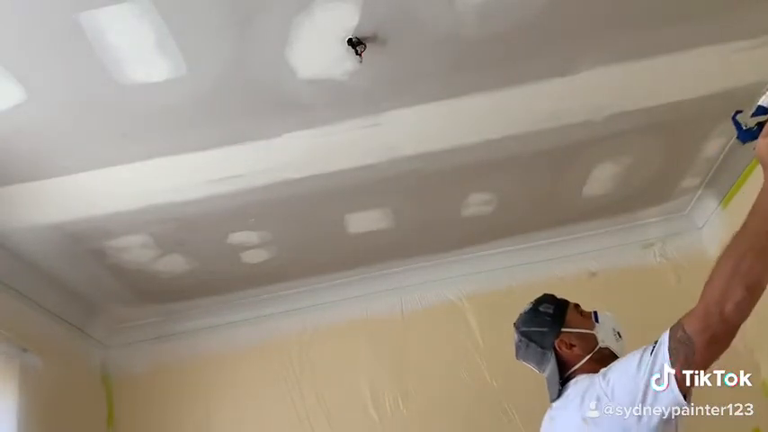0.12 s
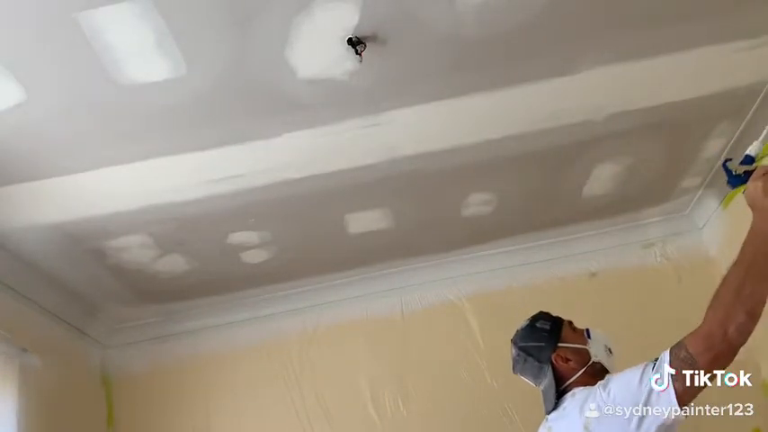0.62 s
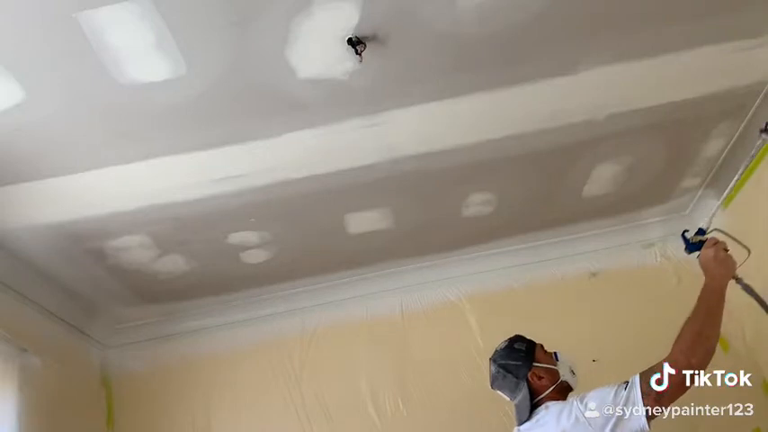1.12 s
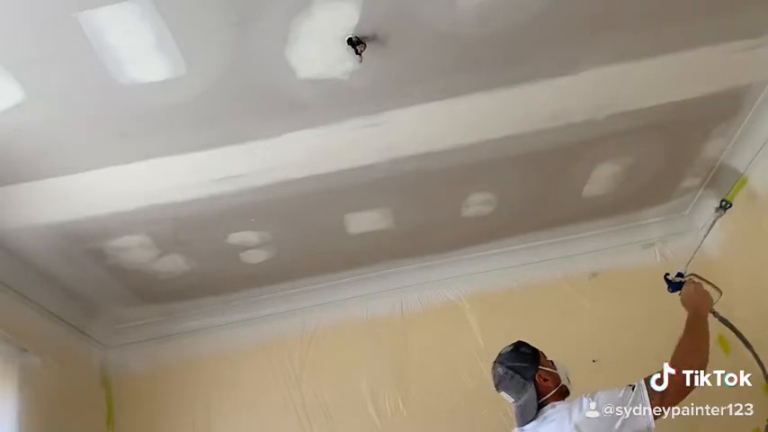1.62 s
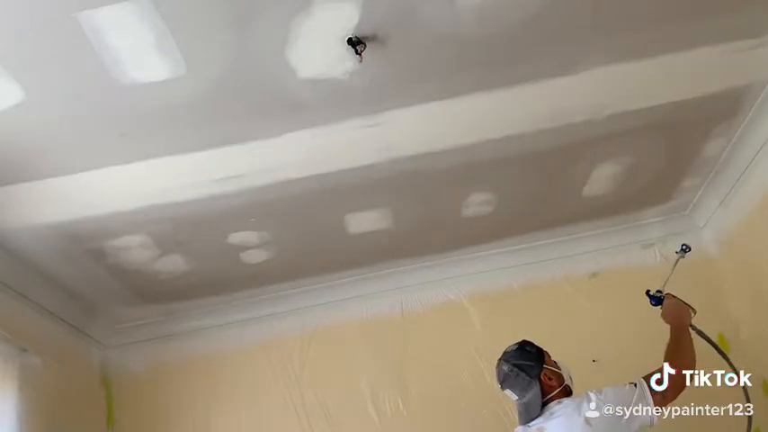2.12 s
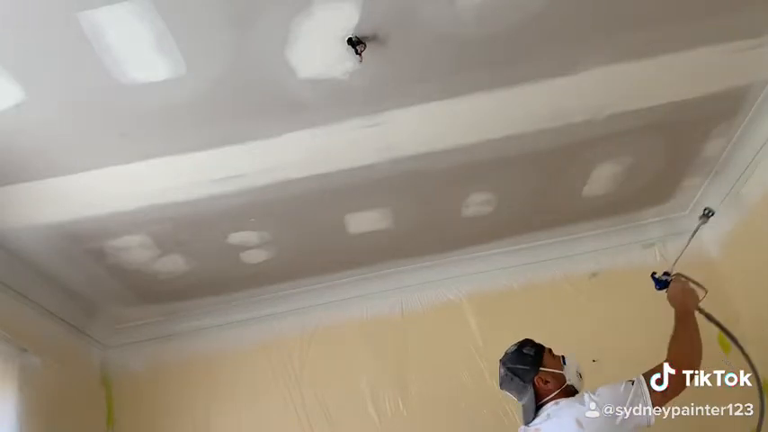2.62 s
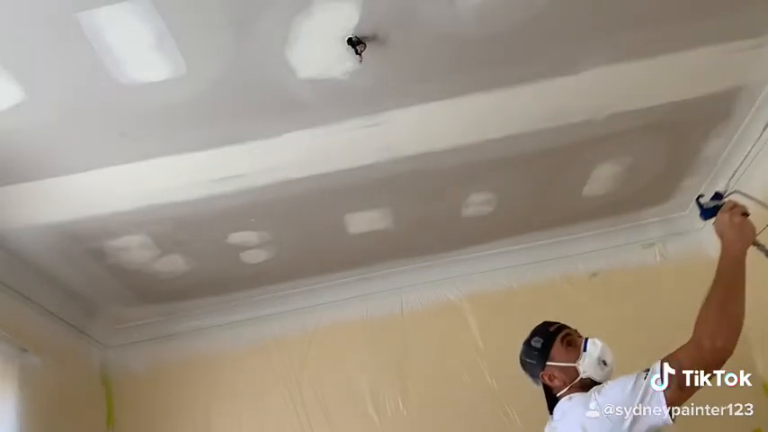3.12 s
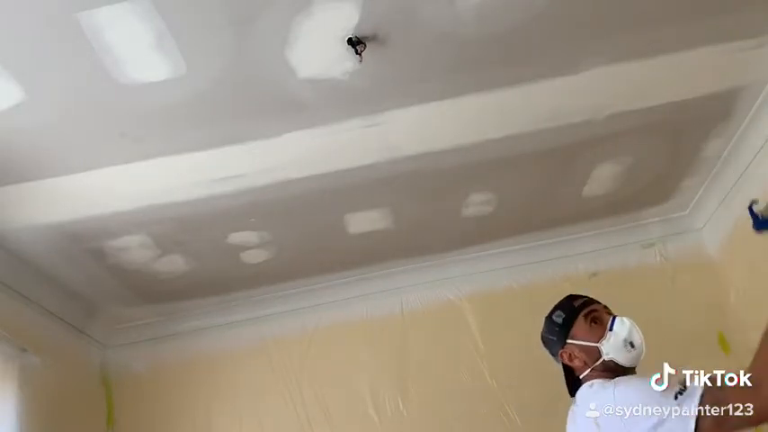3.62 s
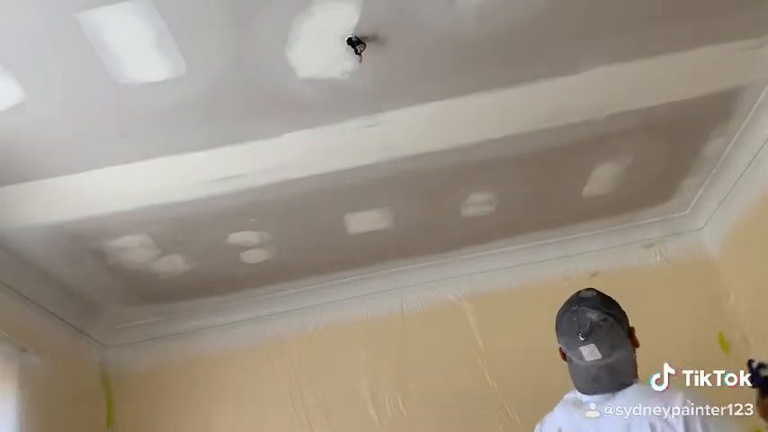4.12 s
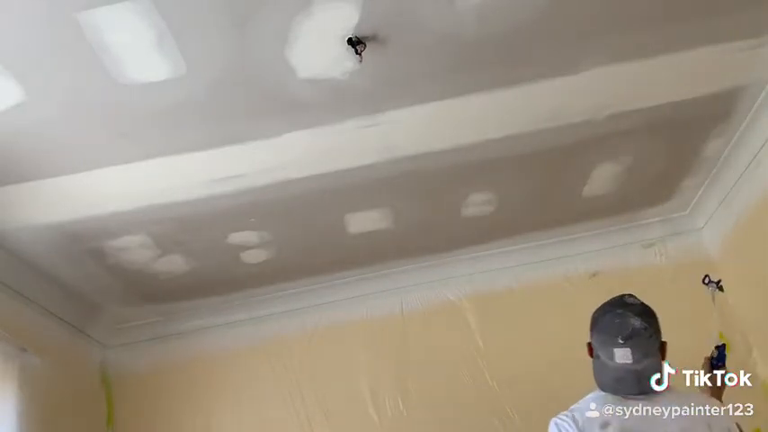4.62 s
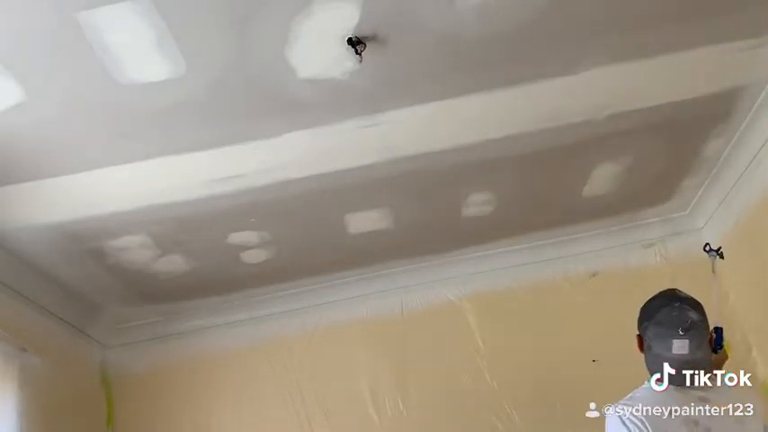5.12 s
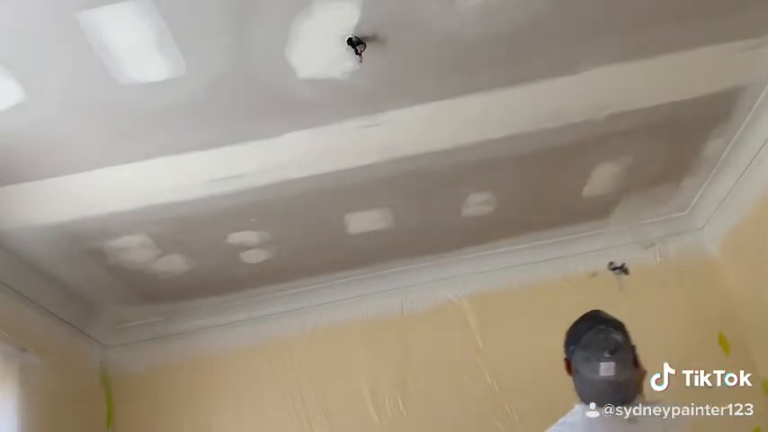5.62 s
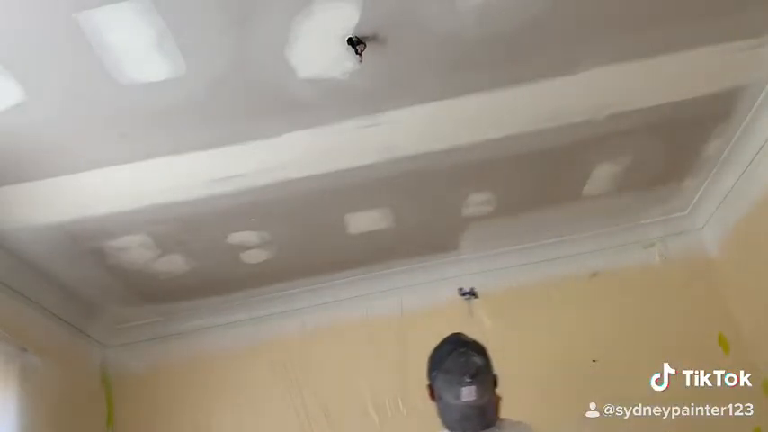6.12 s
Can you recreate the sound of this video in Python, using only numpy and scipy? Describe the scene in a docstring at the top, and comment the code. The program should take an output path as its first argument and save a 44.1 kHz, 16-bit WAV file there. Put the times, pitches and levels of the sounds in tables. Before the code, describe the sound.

A bare, reverberant room with very quiet steady room tone, heard in stereo from a few metres away. At 0.2 s a trigger opens with a firm low thump, a brief surge and dull gust, then a bright, airy, finely sputtering spray hiss, easing slightly after 0.75 s. It cuts off at about 1.87 s, its tail fading quickly off the walls. Faint scuffs and low heel thuds lie beneath. At 2.3 s a softer knock starts a second, slightly weaker hiss, ending at 3.3 s. In the pause, plastic sheeting rustles faintly, shoes scrape from about 3.8 to 4.7 s, and boards thud softly near 4.05 and 4.6 s, with a small crinkle at 4.57 s. At 5.19 s another light knock opens the third, stronger hiss, which continues to the end over subdued shuffling and a final low step.

```python
"""Airless spraying in an empty room

An airless paint gun hisses in three passes under a bare plaster ceiling, a few metres from two microphones.
The jet is shaped noise with a fine sputter; each pull of the trigger adds a decaying thump and a dull gust.
Dense echoes, decaying at a rate set by frequency, let the room ring on after each release.
The painter's steps are damped tones, the shuffling and the faint rustle of floor sheeting gated noise."""
import sys
import numpy as np
from scipy import signal
from scipy.fft import rfft, irfft, next_fast_len
from scipy.io import wavfile
from scipy.ndimage import uniform_filter1d

SR = 44100
rng = np.random.default_rng(int(sys.argv[2]) if len(sys.argv) > 2 else 0)


def unload_wav(signal):
    """Save mono or channel-first audio to the path in sys.argv[1] as 16-bit WAV at rate SR, clipped to [-1, 1]."""
    wavfile.write(
        sys.argv[1],
        SR,
        np.round(np.clip(np.atleast_2d(signal).T, -1, 1) * 32767).astype(np.int16),
    )


def invert_db(x):
    """Field ratio 10**(x/20) for x, a level in decibels (scalar or array-like)."""
    u = np.asarray(x, float) / 20
    return 10 ** u


N = 275625  # samples

# Levels and spectral densities below are relative.
# Steady room tone: (frequency [Hz], density [dB])
TONE_SPECTRUM = [(24, -63.5), (35, -18), (55, -16.5), (150, -9), (300, -9.5), (800, -10), (2000, -15),
                 (5000, -21), (9000, -27), (15500, -38.5)]
# Crinkling plastic: (frequency [Hz], density [dB])
SHEET_SPECTRUM = [(400, -9.5), (800, -4.5), (2000, -2), (4000, -6.5), (7000, -12.5), (9000, -9),
                  (12000, -13), (15500, -14)]
# Single crinkles of the sheeting: (start [s], length [s], level [dB], rise [s])
CRINKLES = [(-.05, 0.051, -71.5, .02), (1.95, 0.28, -66, 0.046), (3.38, 0.25, -61, 0.057),
            (3.656, 0.29, -63.5, 0.1), (4.002, 0.053, -60, 0.035), (4.126, 0.16, -64, 0.065),
            (4.344, 0.052, -65, 0.054), (4.572, 0.054, -50.5, 0.026), (4.76, 0.094, -64, 0.052)]
# Boom of the floor boards: (frequency [Hz], density [dB])
BOARD_SPECTRUM = [(24, -61), (33, -32), (42, 0.5), (52, 11), (70, -1), (110, -9), (200, -58)]
# Soles scraping the floor: (frequency [Hz], density [dB])
SCRAPE_SPECTRUM = [(70, -36), (110, 0), (200, -2), (300, -4), (420, -4.5), (800, -10.5), (2000, -24),
                   (5000, -42.5)]
# Resonances in the scrape: (frequency [Hz], width [Hz], boost [dB])
SCRAPE_RESONANCES = [(107, 25.7, 1.5), (152, 12, 0), (287, 22, 10.5), (387.4, 18.5, 6), (619, 14, 10.5),
                     (1242, 150, 9), (1914, 56, 12.5)]
# Dragged soles: (start [s], length [s], level [dB], brightness [dB per octave above 400 Hz], rise [s])
SCUFFS = [(-.05, 0.091, -58.5, 2, .02), (0.554, 0.53, -52.5, -0.5, 0.056), (1.034, 0.063, -43, 3, .012),
          (1.175, 0.15, -46, 2, 0.025), (1.516, 0.49, -51.5, -1.5, 0.11), (2.585, 0.21, -61.5, 0, 0.027),
          (2.705, 0.58, -51.5, -1.5, 0.08), (3.347, 0.21, -64.5, 6, .05), (3.782, 0.14, -57.5, -14, 0.035),
          (3.954, 0.13, -56.5, -6.5, .03), (4.054, 0.12, -56, 6, 0.088), (4.15, 0.13, -44.5, 0.5, 0.11),
          (4.304, 0.11, -48, 2.5, 0.043), (4.426, 0.09, -46, 0, 0.037), (4.578, 0.13, -51, 0.5, 0.029),
          (5.44, 0.41, -51, -1, 0.11), (5.81, 0.13, -47.5, -3.5, .05), (5.946, 0.21, -52, 1, 0.047)]
# Heels landing; a negative time counts back from the end:
# (time [s], level [dB], pitch [Hz], rise [s], decay by 60 dB [s])
STEPS = [(.56, -51, 58, 0.01, 0.38), (1.041, -48, 92, 0.0061, 0.27), (1.2, -54, 56, 0.012, 0.22),
         (4.05, -43.5, 47, 0.07, 0.54), (-.02, -37, 51, 0.013, .3), (.9, -55, 50, .06, 0.72),
         (3.02, -57.5, 50.2, .06, .8), (5.93, -57, 50, .04, 0.42), (2.74, -56, 54.5, 0.025, 0.21),
         (4.585, -41.5, 53.4, 0.017, 0.22), (5.488, -48.5, 55.6, 0.0084, .35)]
# Reverberation of the room: (frequency [Hz], decay by 60 dB [s])
ROOM_DECAY = [(100, 0.097), (500, 4.1), (1300, 1.27), (3500, 0.67), (9000, 0.39), (15000, 0.19)]
# Pressure surge as the valve opens:
# (time [s], push level [dB], push pitch [Hz], ring level [dB], gust level [dB])
THUMPS = [(.201, -33, 137, -44, -51), (2.32, -47, 210, -52, -49.5), (5.188, -43, 203, -55, -59)]
# Ringing modes of hose and gun: (frequency [Hz], level [dB], decay by 60 dB [s])
HOSE_MODES = [(59, -4, 0.42), (147, -16.5, 0.19), (213, 2, 0.22), (287, -5.5, 0.13), (330, -14, 0.2),
              (373.7, -8.5, 0.23)]
# Dull gust after the push: (frequency [Hz], density [dB])
GUST_SPECTRUM = [(80, -28), (150, -5.5), (300, 0), (450, -13.5), (900, -36.5)]
# Hiss of the jet: (frequency [Hz], density [dB])
JET_SPECTRUM = [(150, -22), (500, -25.5), (1200, -21), (2200, -16.5), (3300, -16), (4500, -11.5),
                (6500, -9), (8500, -3), (11300, 0.5), (13200, 1.5), (15500, 0.5)]
# Trigger pulled and released: (pull [s], release [s], opening surge [dB])
TRIGGER = [(0.199, 1.871, 9), (2.32, 3.293, 1.5), (5.185, 6.3, 0.5)]
# Jet as the gun swings nearer and farther: (time [s], level [dB])
JET_LEVEL = [(.2, -24), (.73, -23.5), (.776, -26.5), (1.87, -27.5), (2.33, -27.5), (3.26, -27),
             (3.3, -28.5), (5.2, -24), (6.14, -25.5), (6.25, -24)]
# Likeness of left and right, before a dip set by their lag: (frequency [Hz], coherence [0 to 1])
COHERENCE = [(40, 1), (100, 0.89), (300, 0.7), (700, 0.035), (1500, 0.19), (3000, 0.018), (5500, 0.025),
             (7000, 0.43), (8500, 1), (16000, 1)]
# Balance of left and right: (frequency [Hz], left minus right [dB])
BALANCE = [(60, -1), (300, -0.7), (1200, 1), (3500, 0.5), (6000, -2), (8000, 0), (16000, 0)]


def evened(x):
    """Normalisation: scales to rms 1."""
    return x / np.sqrt(np.mean(x ** 2) + 1e-20)


def read(points, hz):
    """Linear interpolation along a logarithmic frequency axis."""
    f, value = np.transpose(points)
    return np.interp(np.log(hz + 1), np.log(f + 1), value)


def noise(shape_db, patchy_db, flicker_db, size=512):
    """Spectral synthesis: two independent random spectra, shaped by shape_db(hz, t), share patches and flicker."""
    hop = size // 4
    hz = np.fft.rfftfreq(size, 1 / SR)[:, None]
    t = np.arange(N // hop + 5) * hop / SR
    a, b, c, d, patches = rng.standard_normal((len(t), len(hz), 5)).T
    patches = evened(uniform_filter1d(uniform_filter1d(patches, 6, 0), 12, 1))
    flicker = evened(uniform_filter1d(rng.standard_normal(len(t)), 3))
    gain = invert_db(shape_db(hz, t) + patchy_db * patches + flicker_db * flicker)
    spectra = np.array([a + 1j * b, c + 1j * d]) * gain
    waves = signal.istft(spectra, nperseg=size, noverlap=size - hop)[1]
    return evened(waves[:, :N])


def add(mix, s, sound):
    """Superposition: adds a sound at a time, a negative time counting back from the end."""
    part = mix[round(s * SR):][:len(sound)]
    part += sound[:len(part)]


def swells(rows, rise_s, t60):
    """Envelopes: each row (start, length, level) gives a linear rise, a hold and an exponential decay."""
    t = np.arange(N) / SR
    curves = []
    for (s, length, db, *_), rise in zip(rows, rise_s * np.ones(len(rows))):
        decay = invert_db(db - 60 * np.maximum(t - s - length, 0) / t60)
        curves.append(decay * np.clip((t - s) / rise, 0, 1))
    return np.array(curves)


def room_tone():
    """Stationary noise: a steady random background with a fixed mean spectrum."""
    tone = noise(lambda hz, t: read(TONE_SPECTRUM, hz), patchy_db=1.0, flicker_db=0, size=2048)
    return invert_db(-67) * tone


def sheeting():
    """Impulsive friction: thin plastic crinkles as bursts of patchy broadband noise."""
    bursts = swells(CRINKLES, np.transpose(CRINKLES)[3], t60=.8)
    level = np.linalg.norm(bursts, axis=0)  # powers add
    rustle = noise(lambda hz, t: read(SHEET_SPECTRUM, hz), patchy_db=1.1, flicker_db=0.1)
    return invert_db(3.5) * rustle * level


def feet():
    """Friction and resonance: boards boom under shifting weight, dragged soles scrape through fixed modes."""
    boards_db, boards_rest_db = -12.5, -69  # boom relative to the scuffs, and with the feet still
    power = swells(SCUFFS, np.transpose(SCUFFS)[4], t60=.75) ** 2
    drag = np.sqrt(power.sum(0))
    bright_db = np.transpose(SCUFFS)[3] @ power / (drag ** 2 + 1e-20)  # power-weighted mean

    def scrape_db(hz, at):
        """Filtering: the spectrum is a fixed shape, resonant peaks and a moving treble tilt."""
        peaks = sum(db / (1 + (2 * (hz - f) / width) ** 2) for f, width, db in SCRAPE_RESONANCES)
        octaves = np.clip(np.log2((hz + 1) / 400), 0, 2.5)  # brightness acts above the body of the sound
        tilt = octaves * np.interp(at, np.arange(N) / SR, bright_db)
        return read(SCRAPE_SPECTRUM, hz) + peaks + tilt

    boom = noise(lambda hz, t: read(BOARD_SPECTRUM, hz), patchy_db=1.5, flicker_db=2.5, size=4096)
    scrape = noise(scrape_db, patchy_db=0.5, flicker_db=1.5, size=2048)
    boom_level = np.hypot(invert_db(boards_db) * drag, invert_db(boards_rest_db))
    return boom * boom_level + scrape * drag


def steps():
    """Damped oscillation: each heel sets the floor swinging at a low, slightly sagging pitch."""
    out, t = np.zeros(N), np.arange(SR // 2) / SR
    for s, db, hz, rise, t60 in STEPS:
        sagging_time = t + 0.0026 * (1 - np.exp(-t / 0.054))
        swing = np.sin(2 * np.pi * hz * sagging_time)
        decay = invert_db(db - 60 * np.maximum(t - rise, 0) / t60)
        add(out, s, decay * np.minimum(t / rise, 1) * swing)
    return out


def room(x, count=14):
    """Reverberation: random-sign echoes decay by band; a cycle of echo patterns crossfades as the gun moves."""
    pattern_s = .05  # from one pattern to the next
    out, turn = np.zeros((2, N)), np.arange(N) / SR / pattern_s
    for k in range(count):
        taps = np.zeros((2, SR))
        # one echo at a random place in every 20 samples
        at = np.arange(200, SR - 20, 20) + rng.integers(0, 20, (2, (SR - 201) // 20))
        np.put_along_axis(taps, at, rng.choice([-1., 1.], at.shape), 1)
        hz, t, z = signal.stft(taps, SR, nperseg=256)
        t60 = read(ROOM_DECAY, hz)[:, None]
        decaying = z * invert_db(-60 * t / t60) / np.sqrt(t60)
        tail = signal.istft(decaying, SR, nperseg=256)[1]
        away = abs((turn - k + count / 2) % count - count / 2)
        window = np.cos(np.pi / 2 * np.minimum(away, 1))  # squares of neighbours sum to 1
        out += signal.fftconvolve(x * window, tail / np.linalg.norm(tail[0]), axes=1)[:, :N]
    return out


def valve():
    """Transient excitation: the opening needle gives a brief push and a dull gust; hose and gun ring on."""
    push_rise_s, push_cycles = .003, .9
    gust_hold_s, gust_rise_s, gust_t60_s = 0.081, .012, .25
    out, t = np.zeros(N), np.arange(SR // 2) / SR
    phases = rng.random((len(THUMPS), len(HOSE_MODES)))
    for (s, push_db, hz, ring_db, _), phase in zip(THUMPS, phases):
        bell = np.exp(-((t * hz - 1.4) / push_cycles) ** 2)  # centred 1.4 cycles in
        push = invert_db(push_db) * np.sin(2 * np.pi * hz * t) * bell
        ring = sum(invert_db(db - 60 * t / t60) * np.sin(2 * np.pi * (f * t + p))
                   for (f, db, t60), p in zip(HOSE_MODES, phase))
        add(out, s, (push + invert_db(ring_db) * ring) * (1 - np.exp(-t / push_rise_s)))
    rows = [(s, gust_hold_s, gust_db) for s, *_, gust_db in THUMPS]
    gusts = swells(rows, gust_rise_s, gust_t60_s).sum(0)
    air = noise(lambda hz, at: read(GUST_SPECTRUM, hz), patchy_db=1, flicker_db=1, size=1024)[0]
    return out + gusts * air


def jet():
    """Turbulent atomisation: paint tearing into droplets at the tip gives dense hiss with a fine sputter."""
    open_s, shut_s, surge_fade_s = .005, .006, 0.036
    sputter = invert_db(0.98 * evened(uniform_filter1d(rng.standard_normal(N), 60)))
    hiss = noise(lambda hz, t: read(JET_SPECTRUM, hz), patchy_db=1.37, flicker_db=0.74)
    t = np.arange(N) / SR
    flow = np.zeros(N)
    for pull, release, surge_db in TRIGGER:
        opening = 1 - np.exp(-np.maximum((t - pull) / open_s + .5, 0))
        closing = np.clip((release - t) / shut_s + 1, 0, 1)
        surge = invert_db(surge_db * np.exp(-abs(t - pull) / surge_fade_s))
        flow += opening * closing * surge
    return hiss * sputter * flow * invert_db(np.interp(t, *np.transpose(JET_LEVEL)))


def scene():
    """Superposition: direct and reflected sound of the gun over feet, sheeting and room tone."""
    background = room_tone() + sheeting() + feet() + steps()
    hiss, knock = jet(), valve()
    walls = room(hiss + invert_db(-6) * knock)
    return background + walls + knock + invert_db(-1.5) * hiss


def band_limit(x):
    """A steep low-pass at the top of the band."""
    return signal.sosfilt(signal.butter(12, 16660, fs=SR, output="sos"), x)


def record(dry):
    """Coherence: left and right are most alike in bass and top, the left lags; both are band-limited."""
    left_lag_s, low_edge_hz, high_edge_hz = 0.0002148, 35, 15850
    likeness_dip = 0.26  # share of likeness taken away at a quarter-cycle lag
    phase_snap = 0.31  # radians; pulls the phase between left and right toward in step or opposite
    size = next_fast_len(N + 64)
    hz = np.fft.rfftfreq(size, 1 / SR)
    left, right = rfft(dry, size)
    lag = 2 * np.pi * hz * left_lag_s
    same = np.clip(read(COHERENCE, hz), 0, 1) * (1 - likeness_dip * np.sin(lag) ** 2)
    left = same * right + np.sqrt(1 - same ** 2) * left
    left = left * np.exp(-1j * (lag - phase_snap * np.sin(2 * lag)))
    tilt = invert_db(read(BALANCE, hz) / 2)
    low_cut = 1 / np.sqrt(1 + (low_edge_hz / (hz + 1)) ** 8)
    high_cut = np.clip((high_edge_hz - hz) / 150, 0, 1)
    band = invert_db(2.0) * high_cut * low_cut
    mix = irfft(np.array([left * tilt, right / tilt]) * band, size)[:, :N]
    return band_limit(mix)


dry = scene()
out = record(dry)
unload_wav(out)
```